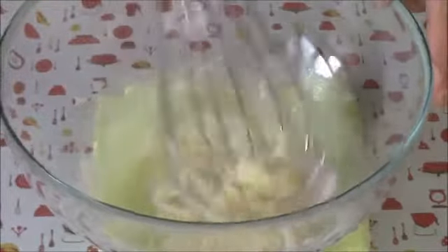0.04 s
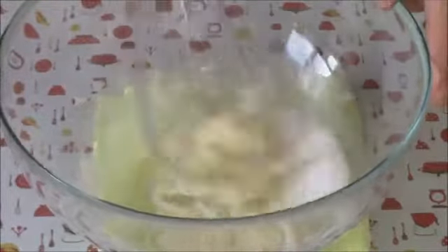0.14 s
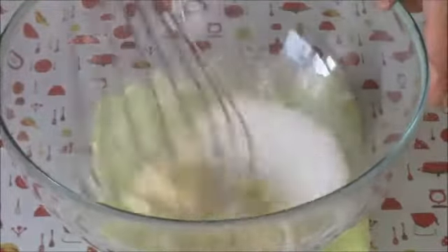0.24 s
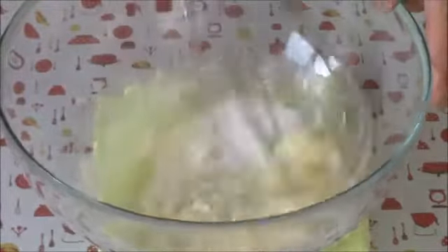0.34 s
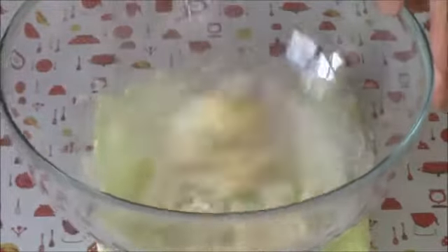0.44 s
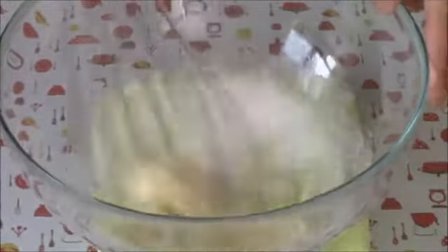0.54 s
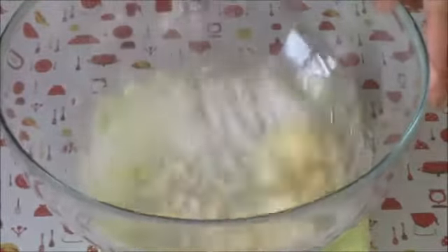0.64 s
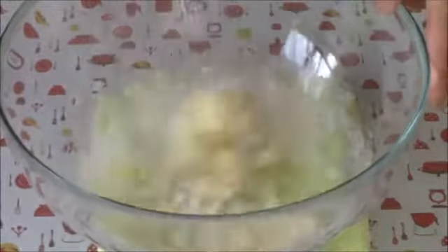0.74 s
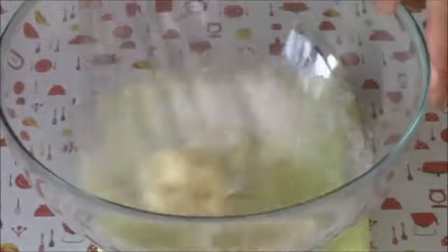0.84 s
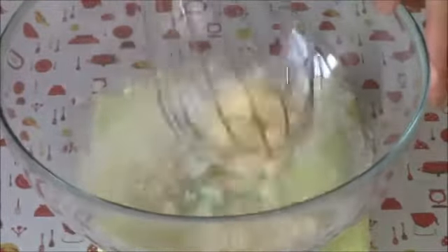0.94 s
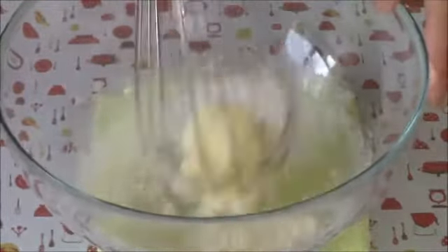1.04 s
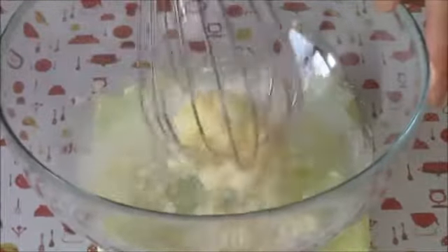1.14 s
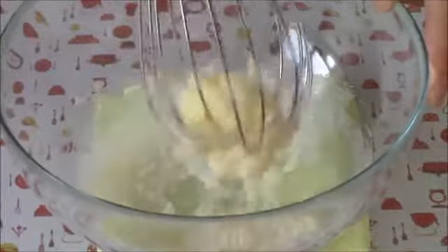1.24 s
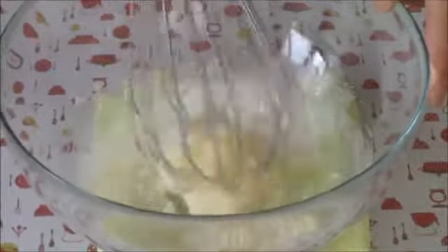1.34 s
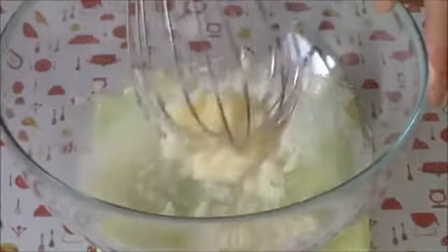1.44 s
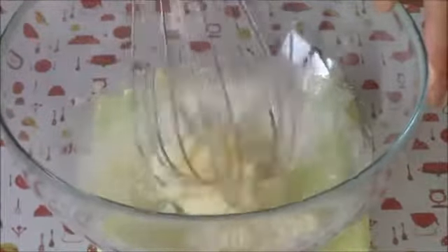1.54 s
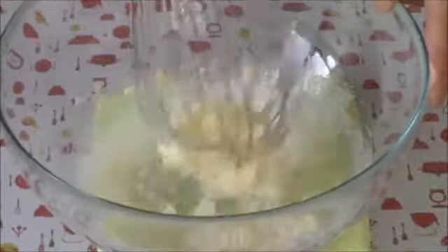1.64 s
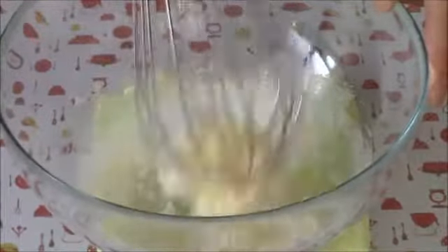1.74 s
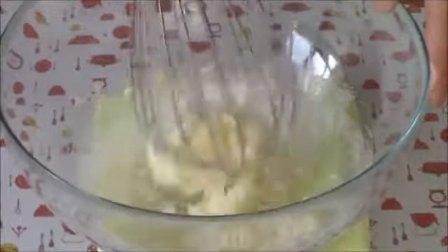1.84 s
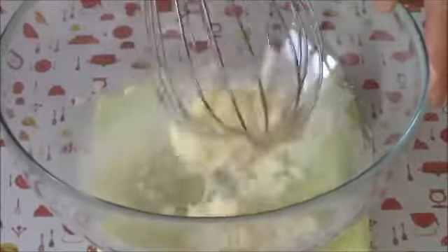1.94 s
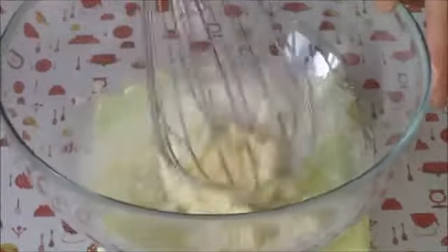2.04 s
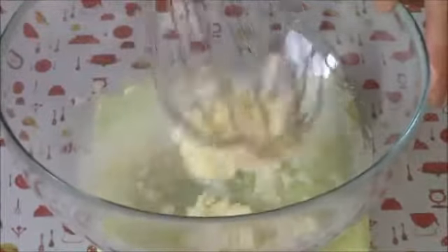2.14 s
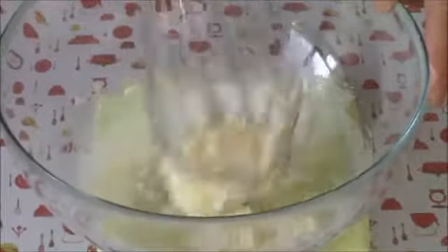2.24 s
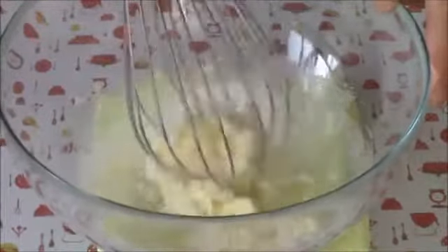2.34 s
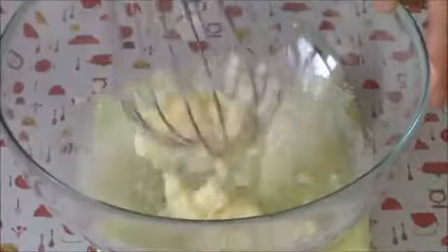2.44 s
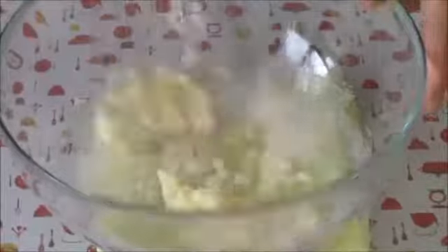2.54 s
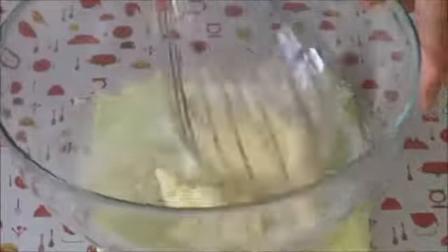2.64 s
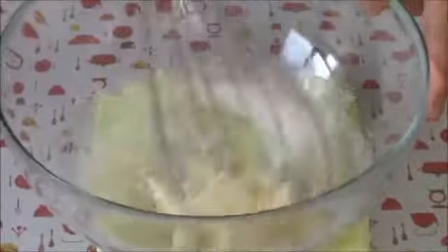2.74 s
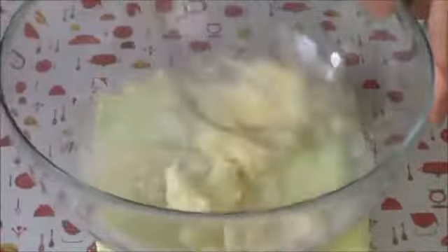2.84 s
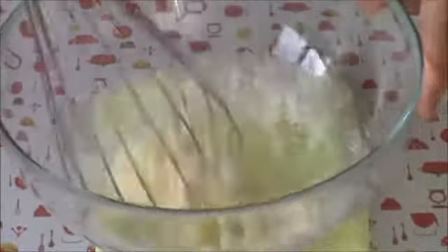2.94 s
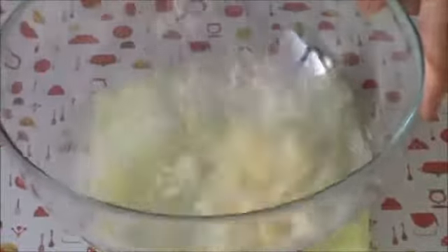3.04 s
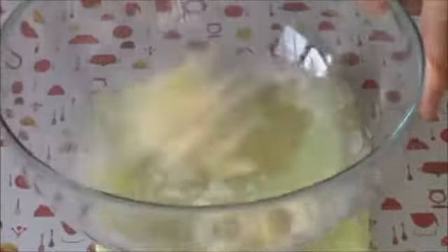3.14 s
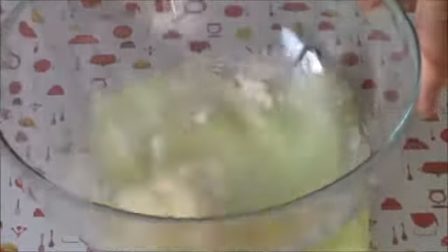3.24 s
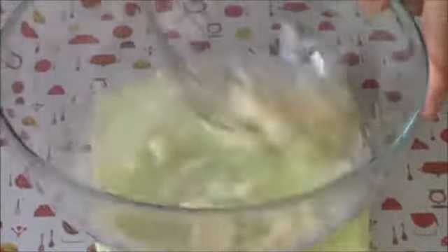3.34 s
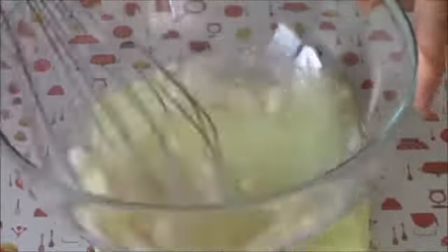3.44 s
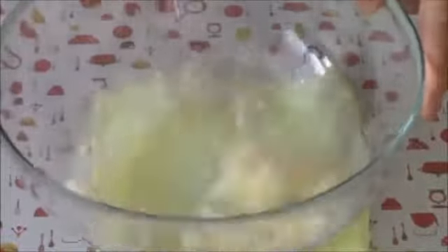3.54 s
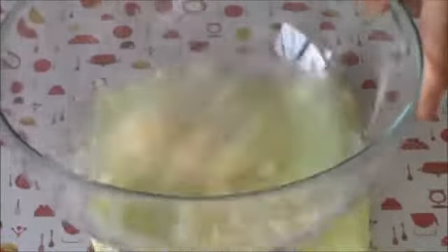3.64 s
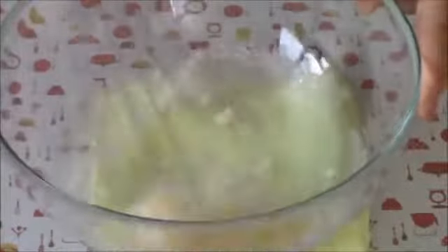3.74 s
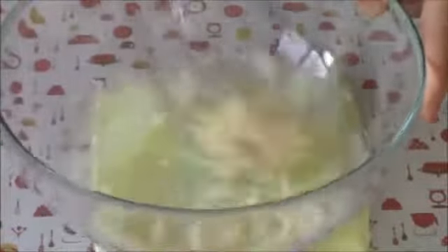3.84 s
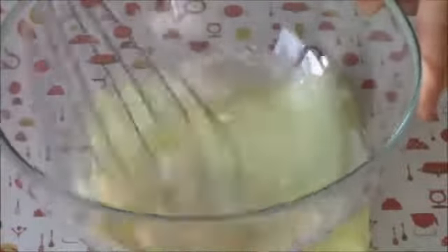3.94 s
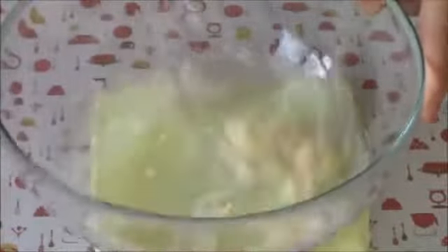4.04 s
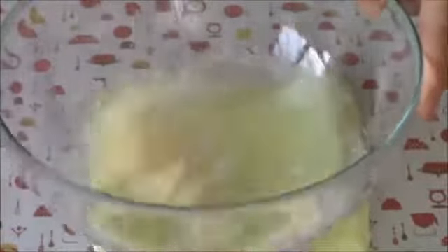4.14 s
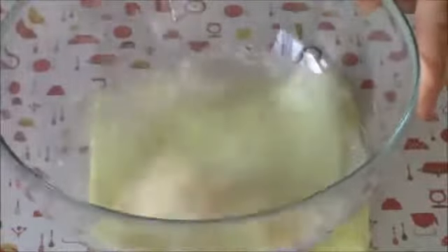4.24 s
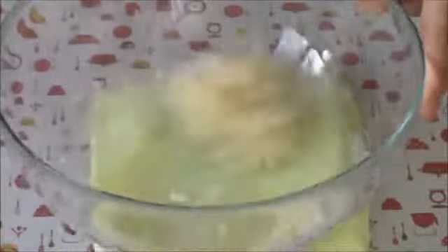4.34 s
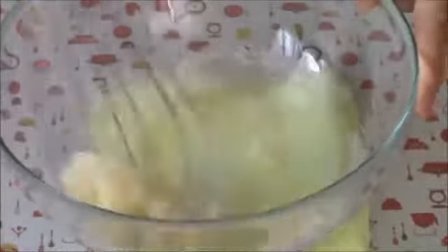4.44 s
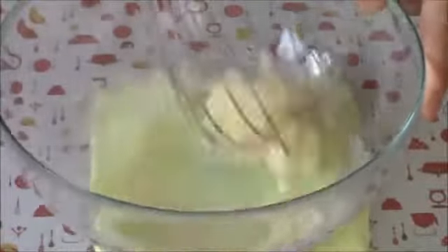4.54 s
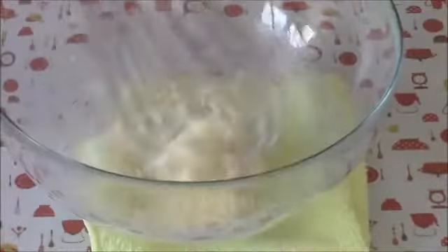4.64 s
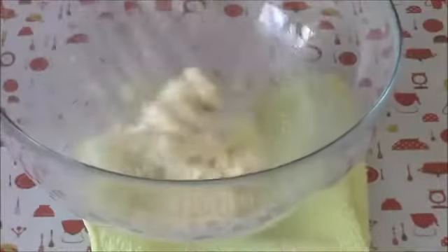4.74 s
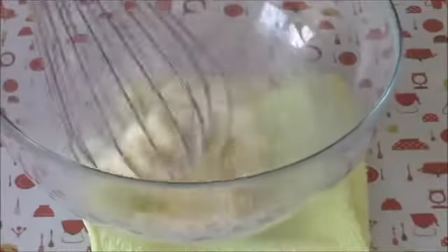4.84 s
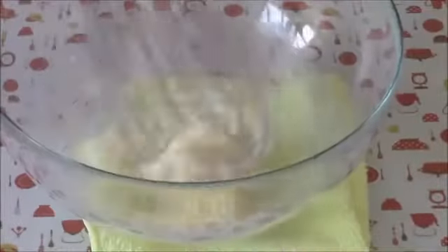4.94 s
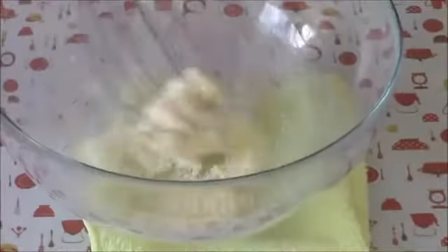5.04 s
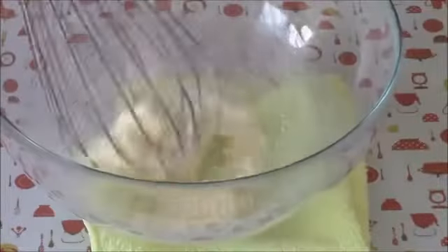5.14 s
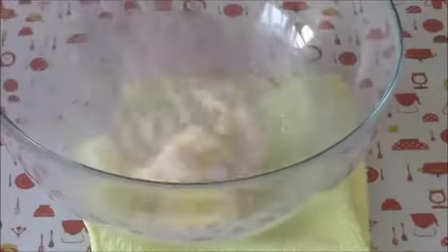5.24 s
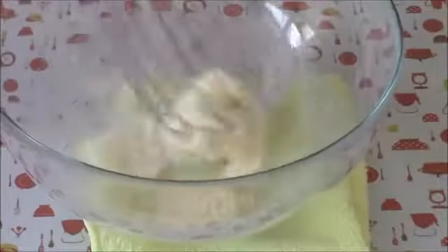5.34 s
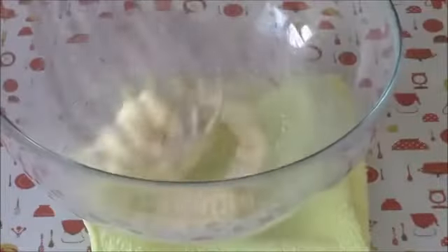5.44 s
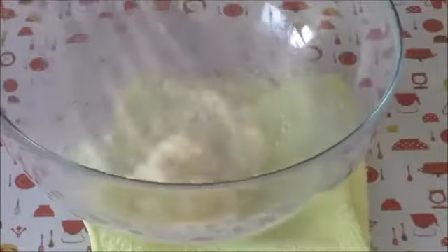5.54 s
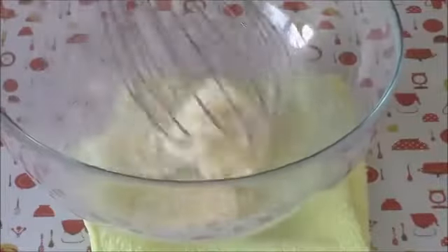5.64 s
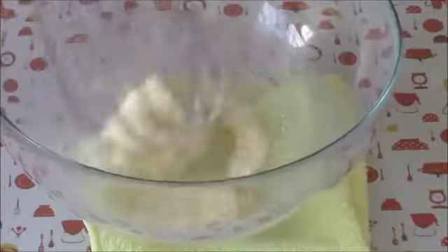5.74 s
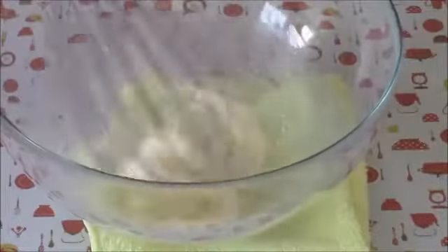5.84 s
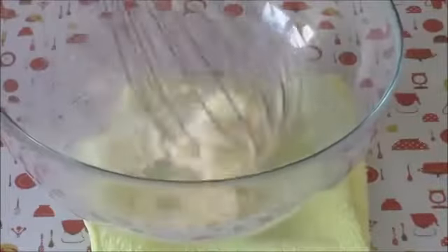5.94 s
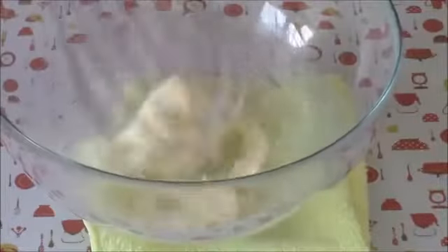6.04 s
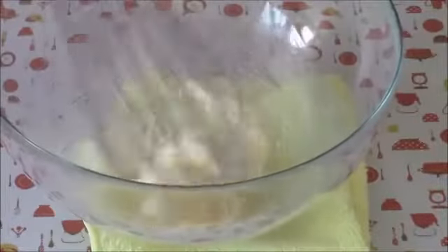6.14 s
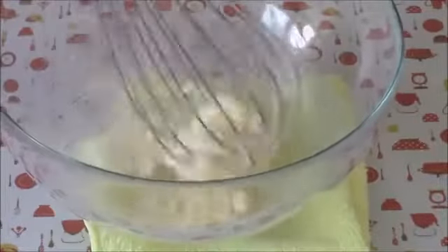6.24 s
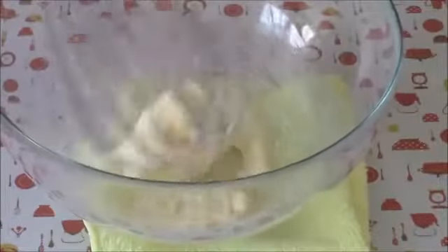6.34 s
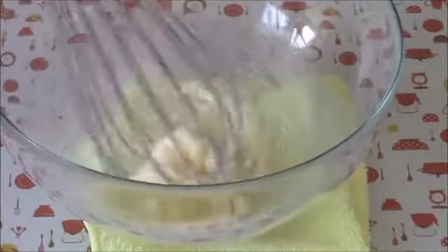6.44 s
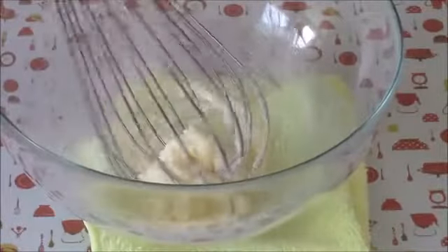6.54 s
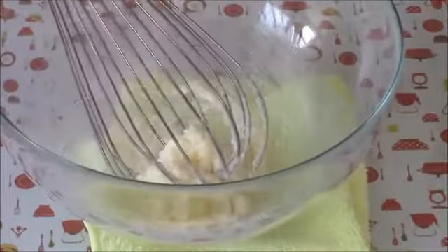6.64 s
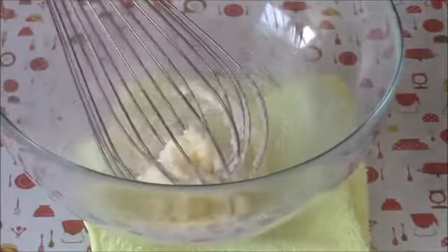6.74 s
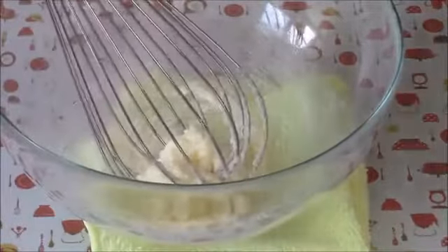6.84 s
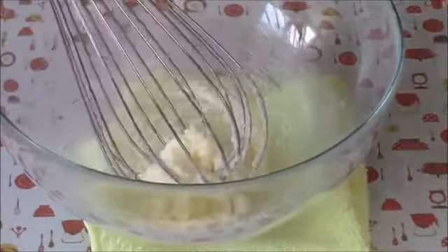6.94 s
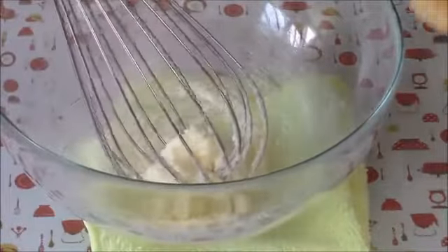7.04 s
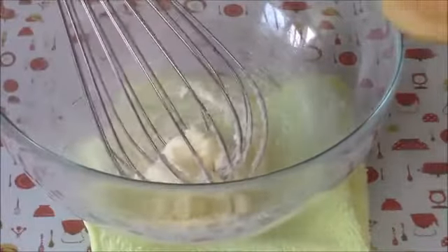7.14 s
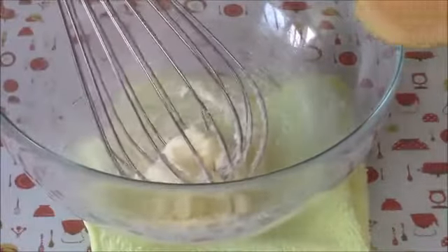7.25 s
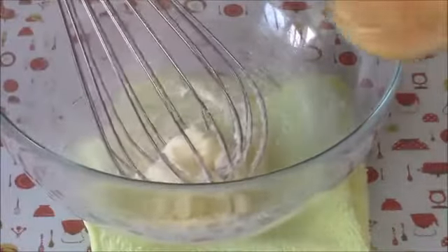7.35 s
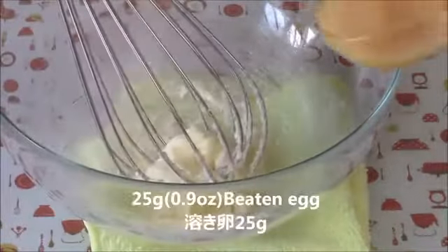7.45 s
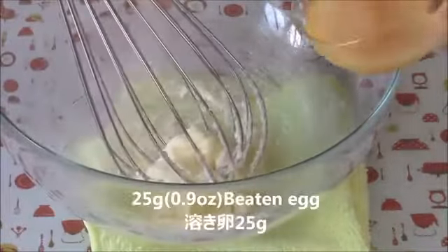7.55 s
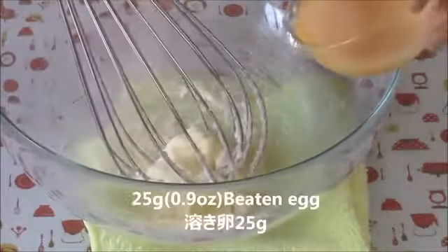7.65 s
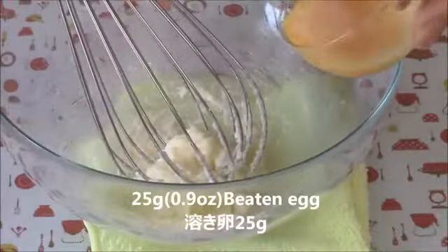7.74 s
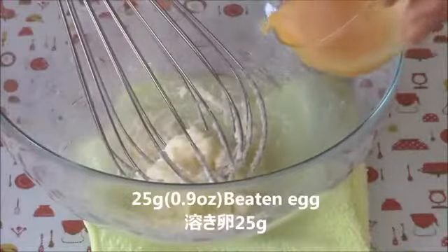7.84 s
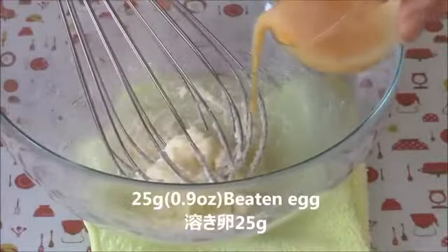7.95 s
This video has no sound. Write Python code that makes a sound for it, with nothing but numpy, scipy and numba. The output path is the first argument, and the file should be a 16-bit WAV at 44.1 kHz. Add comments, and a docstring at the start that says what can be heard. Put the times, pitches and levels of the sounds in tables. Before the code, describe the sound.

A wire whisk sweeps through grainy sugar, then stabs the glass bowl in a steady run of loud metallic clinks and dull table knocks. Busy crunchy scraping with smaller clinks comes next. Midway the background drops abruptly and the strokes become soft and muffled. They die out into faint air, tiny ticks and cricket chirps, heard close in a small room.

```python
"""A wire whisk clinks and scrapes through butter and sugar in a glass bowl, close to the ear.
Most hard stabs are followed by a knock as the bowl is driven onto the table.
Noise bursts and sliding noise shake sets of ringing modes: wires, sugar, bowl and table.
A small kitchen adds its echo, with faint air noise, even ticking and a cricket outside.
At 4.737 s the background drops, and the last strokes are quieter and duller."""
import sys
import numpy as np
from scipy import signal
from scipy.fft import rfft, irfft
from scipy.io import wavfile
from scipy.ndimage import uniform_filter1d
from numba import njit

SR = 44100
rng = np.random.default_rng(int(sys.argv[2]) if len(sys.argv) > 2 else 0)


def store_wav(level_fs):
    """Save 16-bit WAV to argv[1]."""
    pcm = np.round(np.clip(np.atleast_2d(level_fs), -1, 1) * 32767)
    wavfile.write(sys.argv[1], SR, pcm.T.astype(np.int16))


N = 352800
T = np.arange(N) / SR  # time of every sample, s

# Levels in the tables are starting levels; the functions below then balance the layers.
# Wires meeting the glass: time_s, level_db
WIRE_CLINKS = [(0.0422, -26.5), (0.185, -34), (0.343, -20.5), (0.6564, -15.5), (0.708, -23.5),
               (1.0816, -5.5), (1.3228, -6.5), (1.5584, -5.5), (1.796, -5), (2.044, -10), (2.296, -9),
               (2.5606, -8), (2.697, -21), (2.8116, -24.5), (2.981, -28.5), (3.071, -22), (3.13, -28),
               (3.207, -24), (3.218, -12), (3.2814, -22), (3.3188, -18.5), (3.37, -26), (3.397, -23.5),
               (3.4097, -22.5), (3.472, -26.5), (3.521, -27), (3.5726, -16.5), (3.6522, -23), (3.712, -23),
               (3.8158, -20.5), (3.891, -24.5), (3.939, -17.5), (4.0414, -23.5), (4.137, -22.5),
               (4.172, -24), (4.1932, -20), (4.295, -20), (4.3868, -20.5), (4.412, -26), (4.435, -25),
               (4.5109, -14.5), (4.547, -18), (4.662, -15.5), (4.716, -20.5), (4.875, -31.5), (4.888, -38),
               (4.965, -44), (5.199, -33.5), (5.605, -39), (5.8422, -29), (5.9304, -39.5), (6.125, -49),
               (6.137, -42), (6.165, -45), (6.392, -38), (6.4064, -36), (6.471, -38), (6.59, -39.5),
               (6.9677, -42.5)]
# Sweeps of the wires through the sugar: middle_s, length_s, hiss_db, crunch_db (added to the hiss level)
WHISK_STROKES = [(0.196, 0.06, -49, -8), (0.364, 0.015, -40.5, -13), (0.498, 0.1, -44, -4.5),
                 (0.617, 0.02, -45.5, -14), (0.7, 0.048, -47.5, 0), (0.773, 0.051, -46.5, -10),
                 (2.607, 0.061, -51.5, -23), (2.702, 0.016, -49, 5.5), (2.845, 0.067, -44, -6.5),
                 (2.947, 0.052, -44.5, -13), (3.076, 0.021, -45.5, -3.5), (3.164, 0.021, -41, -1),
                 (3.234, .04, -56, -1), (3.347, 0.036, -40.5, -9), (3.423, 0.061, -50, 0.5),
                 (3.554, 0.078, -41, -4.5), (3.64, 0.041, -40, -11), (3.783, 0.063, -43, -12),
                 (3.83, 0.025, -58, -2), (3.874, 0.031, -42.5, -10), (4.064, 0.016, -37.5, -6),
                 (4.163, 0.064, -49, -0.5), (4.301, 0.019, -32.5, -11.5), (4.385, 0.018, -46, -4),
                 (4.53, 0.018, -37, -7), (4.652, 0.027, -40, -9), (4.873, 0.037, -50, -13),
                 (5.05, 0.094, -60, -2), (5.222, 0.05, -54.5, -9), (5.41, 0.062, -68.5, 4),
                 (5.485, 0.063, -53.5, -13), (5.673, 0.077, -60.5, 3), (5.866, 0.06, -58, -23),
                 (5.96, 0.068, -60.5, -4), (6.112, 0.042, -59, -20), (6.244, 0.012, -55.5, 1.5),
                 (6.33, 0.18, -59, -2), (6.474, 0.037, -51.5, -3), (6.739, 0.057, -66, -3)]
# Spells of whisking, with a steady slide under the strokes: start_s, end_s, drag_db, crunch_db
WHISK_SPELLS = [(0.048, 0.803, -55, -55.5), (2.814, 4.708, -50.5, -53), (4.74, 6.157, -58.5, -60.5)]
# Dry ticks of a single wire tip that hardly ring: time_s, level_db
TIP_TICKS = [(0.378, -28), (0.761, -19), (2.789, -31), (2.853, -30), (2.933, -26), (3.503, -24),
             (3.82, -17), (4.269, -32), (4.279, -23), (4.493, -33), (4.637, -31.5), (4.787, -38.5),
             (4.858, -29), (4.906, -32), (5.07, -29), (5.414, -37), (5.445, -36), (5.471, -42),
             (5.511, -37), (5.648, -30.5), (5.708, -33), (5.845, -33), (6.053, -37.5), (6.238, -32),
             (6.455, -43), (6.59, -30)]
# Dull taps on the bowl wall: time_s, level_db, favoured_pitch_hz
BOWL_TAPS = [(0.049, -31.5, 613), (0.346, -36, 643), (0.66, -38, 774), (0.709, -40, 1470),
             (1.081, -24.5, 790), (1.324, -18, 700), (1.56, -11.5, 2750), (1.801, -17, 2460),
             (2.05, -13.5, 2700), (2.298, -17, 654), (2.559, -26, 1470), (2.697, -30, 636),
             (2.87, -29.5, 1560), (3.127, -31.5, 1470), (3.219, -24.5, 2040), (3.282, -32.5, 950),
             (3.319, -33.5, 670), (3.369, -28, 1460), (3.573, -28, 673), (3.649, -34.5, 1460),
             (3.82, -32, 673), (3.868, -43, 1460), (3.889, -31, 1550), (4.045, -30.5, 655),
             (4.288, -23.5, 1320), (4.513, -33, 840), (4.549, -27, 1560), (4.661, -32.5, 905),
             (5.07, -43, 920), (6.24, -54, 790)]
# Bowl driven onto the table: time_s, level_db
BOWL_KNOCKS = [(1.1097, -10), (1.347, -33.5), (1.5868, -17), (1.8248, -11.5), (2.0751, -8), (2.3278, -11)]
# Ringing of the steel wires: pitch_hz, width_hz, level_db
WIRE_MODES = [(6000, 480, -8.5), (7140, 63, -6), (8177, 71, 6), (8680, 63, -4.5), (9290, 210, 2),
              (10140, 76, 5.5), (10670, 47, 0.5), (11350, 250, -4), (12400, 80, -4.5), (13300, 200, -14.5),
              (14800, 120, -19)]
# Broad colours of crushed grains: pitch_hz, width_hz, level_db
SUGAR_MODES = [(2543, 1200, -31), (3670, 1330, 9.5), (6140, 560, -0.5), (9700, 970, -0.5)]
# Ringing of the glass bowl: pitch_hz, width_hz, level_db
BOWL_MODES = [(673.6, 47, -0.5), (795, 46, 2), (888, 110, 3.5), (1463, 63, 4), (2176, 110, -10)]
# Ringing of the table top: pitch_hz, width_hz, level_db
TABLE_MODES = [(236, 22, -9.5), (497, 80, -7), (750, 78, 2.5), (1170, 74, -12), (1435, 50, -6),
               (1833, 100, 6.5), (2150, 270, -10), (2380, 120, -0.5), (2700, 57, -8.5), (3620, 29, -13.5),
               (3800, 37, -15)]
# Colour of steel ticking on glass: frequency_hz, level_db
GRIT_COLOUR = [(400, -26.5), (1100, -4), (4500, -12), (6000, 1.5), (10400, -2.5), (15000, -22)]
# Colour of the broad part of the knock: frequency_hz, level_db
THUD_COLOUR = [(30, -47.5), (120, -56), (275, -33), (400, -17), (1000, -9.5), (2200, -3.5), (3800, -9),
               (4600, -25.5), (12000, -46.5)]
# How long the room echo takes to fade by 60 dB: frequency_hz, fade_s
ROOM_FADE = [(150, 0.32), (1000, 0.34), (2800, 0.18), (7000, 0.18), (14000, .1)]
# Colour of the room air: frequency_hz, level_db
AIR_COLOUR = [(25, -27), (110, -28.5), (190, -15), (260, -6.5), (900, -2.5), (1300, -6.5), (1550, -7.5),
              (1625, 0.5), (1700, -9), (2400, -12), (5000, -18), (10000, -24), (16000, -31)]
# Cricket phrases: start_s, chirp_count, level_db
CRICKET_PHRASES = [(-.03, 1, -78), (0.856, 1, -77), (1.466, 1, -67), (1.967, 1, -67), (6.604, 2, -74),
                   (6.944, 5, -72.5), (7.674, 2, -77.5)]

CUT_S = 4.737  # the quieter part starts here
EDGE_DB_PER_S = 350  # how fast a sweep swells and fades outside its length
AIR_EARLY_DB, AIR_LATE_DB = -56, -63
CRICKET_HZ, CHIRP_S, CHIRP_GAP_S = 5561, 0.07, 0.131  # the gap runs from start to start
TICKING_HZ, TICKING_FROM_S, TICKING_EVERY_S = 2122, 0.0695, 0.06672
TICKING_LATE_DB = -58.5  # average push in the quieter part
TOP_HZ = 15100


def whisk():
    """Clinks and dragged sugar shake the wires and bowl; thin bodies give out little bass."""
    time_s, level_db = np.transpose(WIRE_CLINKS)
    drag, crunch = slides()
    clink = bursts(time_s - 0.001, level_db - 6, 0.0061, 0.00031)
    # hard stabs add a sharp crack just after the clink begins
    crack = bursts(time_s - 0.0005, 1.8 * level_db + 1.5, 0.001, 0.0003)
    steel = undb(-2) * wires(drag, clink)
    steel += undb(-5) * grit(drag, clink, crack)
    steel += undb(-8.5) * sugar(crunch)
    steel += undb(-1) * wire_tips()
    # creamed butter coats the wires
    coated = signal.sosfilt(signal.butter(1, 9000, fs=SR, output="sos"), steel)
    steel = np.where(T < CUT_S, steel, undb(4) * coated)
    return highpass(highpass(steel + bowl(crunch), 500), 230)


def slides():
    """Strokes and steady spells set the strength of drag and crunch; the wires catch and let go."""
    slip = undb(1.6 * walk(70) + 2.84 * walk(250))
    drag, crunch = np.zeros(N), np.zeros(N)
    for middle, length, hiss_db, crunch_db in WHISK_STROKES:
        stroke = sweep(middle - length / 2, middle + length / 2, hiss_db)
        drag += stroke
        crunch += stroke * undb(crunch_db)
    for start, end, drag_db, crunch_db in WHISK_SPELLS:
        drag += sweep(start, end, drag_db)
        crunch += sweep(start, end, crunch_db)
    return slip * drag, slip * crunch


def wires(drag, clink):
    """Steel wires ring when they hit or slide; sliding ones sing only in patches of bare glass."""
    singing = drag * undb(3 * walk(40) - 2.5)
    return body(crackle(0.87) * (singing + clink), WIRE_MODES, 5.6, 45, drift=0.008)


def grit(drag, clink, crack):
    """Steel ticks on glass as uneven noise; flat blows reach lower than glancing ones."""
    push = undb(-2.5) * clink + crack + undb(-2.5) * drag
    tick = colour(crackle(2.1) * push, GRIT_COLOUR)
    bright = highpass(tick, 7200)
    return bright + (tick - bright) * undb(3 * walk(22) - 5.5)


def sugar(crunch):
    """Crushed grains crackle through broad modes that wander in pitch."""
    return body(crackle(2.1) * crunch, SUGAR_MODES, 7, 22, drift=0.12)


def wire_tips():
    """Single wire tips make short dry noise ticks with hardly any ring."""
    tick = rng.standard_normal(N) * bursts(*np.transpose(TIP_TICKS), 0.0012, 0.0009)
    return colour(tick, [(1200, -15), (3000, -4.5), (11000, -3.5)])


def bowl(crunch):
    """The crunching sugar and the taps ring the glass bowl."""
    return body(crackle(3.2) * undb(-10) * crunch, BOWL_MODES, 13, 25, drift=0.028) + taps()


def taps():
    """Each tap rings mostly the bowl mode nearest to its favoured pitch."""
    time_s, level_db, favoured_hz = np.transpose(BOWL_TAPS)
    noise = rng.standard_normal(N)
    out = np.zeros(N)
    for hz, width, _ in BOWL_MODES:
        loss_db = np.minimum(60 * abs(np.log(favoured_hz / hz)), 18)
        push = noise * bursts(time_s - 0.001, level_db - loss_db, 0.0065, 0.0039)
        out += ring(push, hz * (1 + 0.026 * walk(12)), float(width))
    return out


def knocks():
    """The bowl's foot touches, then lands fully; the table top rings, clacks and gives a low thump."""
    time_s, level_db = np.transpose(BOWL_KNOCKS)
    touch = bursts(time_s - 0.0055, level_db - 8.5, 0.0048, 0.0017)
    landing = bursts(time_s - 0.001, level_db - 1.5, 0.011, 0.0012)
    push = crackle(0.4) * (touch + landing)
    table = highpass(undb(-7) * body(push, TABLE_MODES, 1.2, 6, drift=0.015), 260)
    thud = undb(-2) * colour(push, THUD_COLOUR)
    clack = rng.standard_normal(N) * bursts(time_s - 0.001, level_db - 8, 0.0062, 0.0003)
    clack = signal.sosfilt(signal.butter(2, [4200, 8500], "band", fs=SR, output="sos"), clack)
    # the table gives under each knock: a 65 Hz mode
    thump = ring(bursts(time_s, level_db, 0.0055, 0.001), 65 + 0 * T, 45.)
    thump = highpass(undb(-85.5) * unit(thump), 45)
    return table + thud + clack + thump


def kitchen(x):
    """Room echo as fading noise, with its own fade time in each octave of pitch."""
    t, tail = T[:SR // 2], 0
    room_hz, fade_s = np.transpose(ROOM_FADE)
    for hz in 100 * 2 ** np.arange(8):
        t60 = np.interp(np.log(hz), np.log(room_hz), fade_s)
        edges = [hz / 2 ** 0.5, min(hz * 2 ** 0.5, 0.45 * SR)]
        sos = signal.butter(2, edges, "band", fs=SR, output="sos")
        tail = tail + signal.sosfilt(sos, rng.standard_normal(len(t))) * undb(-60 * t / t60)
    tail = tail * np.clip(t / 0.015, 0, 1)  # the echo builds up over 15 ms
    return signal.fftconvolve(x, tail / np.sqrt(np.sum(tail ** 2)))[:N]


def cricket():
    """Phrases of short even chirps: a sine on one pitch, switched on and off with a flutter in level."""
    gate = np.zeros(N)
    for phrase_s, count, level_db in CRICKET_PHRASES:
        for k in range(round(count)):
            start = phrase_s + k * CHIRP_GAP_S
            inside_s = np.minimum(T - start, start + CHIRP_S - T)
            gate += undb(level_db) * np.clip(inside_s / 0.006, 0, 1)
    # root 2 turns the listed level into the sine's peak
    return 2 ** 0.5 * gate * undb(1.6 * walk(150)) * np.sin(2 * np.pi * CRICKET_HZ * T)


def ticking():
    """A faint, even, dull tick: noise bursts through one very broad mode."""
    time_s = np.arange(TICKING_FROM_S, N / SR, TICKING_EVERY_S)
    level_db = TICKING_LATE_DB + 1.8 * rng.standard_normal(len(time_s))
    level_db += np.where(time_s < CUT_S, AIR_EARLY_DB - AIR_LATE_DB, 0)
    push = rng.standard_normal(N) * bursts(time_s, level_db, 0.0025, 0.00078)
    return ring(push, TICKING_HZ + 0 * T, 1200.)


def air():
    """Nearly steady room noise, coloured from random samples and lower after the drop."""
    level_db = np.where(T < CUT_S, AIR_EARLY_DB, AIR_LATE_DB) + 0.5 * walk(12)
    return colour(rng.standard_normal(N), AIR_COLOUR) * undb(level_db)


def undb(db):
    """Decibels to gain."""
    return 10 ** (np.asarray(db) / 20)


def unit(x):
    """Scale to an rms (average strength) of 1."""
    return x / np.sqrt(np.mean(x ** 2))


def highpass(x, hz):
    """Take away the bass below hz."""
    return signal.sosfilt(signal.butter(2, hz, "high", fs=SR, output="sos"), x)


def walk(rate):
    """Random levels, rate per second, with sloped steps; spread near 1."""
    hold = int(SR / rate)
    steps = np.repeat(rng.standard_normal(N // hold + 1), hold)
    return uniform_filter1d(steps, hold // 2)[:N]


def bursts(times, peak_db, fade_s, rise_s):
    """Strength of contacts that start fast and die away."""
    out = np.zeros(N)
    for start, db in zip(times, peak_db):
        first = int(start * SR)
        t = np.clip(T[first:first + SR // 8] - start, 0, None)
        out[first:first + len(t)] += undb(db) * (1 - np.exp(-t / rise_s)) * np.exp(-t / fade_s)
    return out


def sweep(start, end, db):
    """Gain of a contact that holds between two times and slopes away on both sides."""
    outside_s = np.clip(np.maximum(start - T, T - end), 0, None)
    return undb(db - EDGE_DB_PER_S * outside_s)


def crackle(spread_db):
    """Noise of uneven grains: a few samples jump out above the rest."""
    jump_db = spread_db * np.minimum(rng.exponential(size=N), 4)
    return unit(rng.standard_normal(N) * undb(jump_db))


def body(push, modes, scatter_db, rate, drift):
    """Modes share the push unevenly and bend a little as contact and load move; total power stays."""
    share = np.array([undb(db + scatter_db * walk(rate)) * np.sqrt(width) for _, width, db in modes])
    share /= np.sqrt(np.sum(share ** 2, axis=0))
    out = np.zeros(N)
    for gain, (hz, width, _) in zip(share, modes):
        out += ring(push * gain, hz * (1 + drift * walk(rate / 2)), float(width))
    return out


@njit
def ring(x, hz, width):
    """One mode whose pitch may move; a wider mode dies faster; white input keeps its power."""
    y, z, p = np.empty(len(x)), 0j, 0j
    r = np.exp(-np.pi * width / SR)
    g = np.sqrt(2 * (1 - r * r))
    for i in range(len(x)):
        if i % 32 == 0:  # update the pitch
            p = r * np.exp(2j * np.pi * hz[i] / SR)
        z = z * p + x[i] + 1e-18
        y[i] = g * z.imag
    return y


def colour(x, points):
    """Filter through (frequency_hz, level_db) points, never sounding early; white input keeps its power."""
    hz, db = np.transpose(points)
    grid_hz = np.arange(1, 2050) * SR / 4096
    gain = undb(np.interp(np.log(grid_hz), np.log(hz), db))
    # folding the log spectrum forward in time makes the filter react at once
    c = irfft(np.log(gain / np.sqrt(np.mean(gain ** 2))))
    c[1:2048] *= 2
    c[2049:] = 0
    return signal.fftconvolve(x, irfft(np.exp(rfft(c))))[:len(x)]


def scene():
    """Whisk and knocks with their room echo, over cricket, ticking and air."""
    strokes, blows = whisk(), knocks()
    send = undb(-10) * strokes + undb(-9) * blows
    early = T < CUT_S
    # the echo of the first part stops short where the quieter part starts
    echo = early * kitchen(early * send) + kitchen(~early * send)
    return (strokes + blows + echo + cricket() + ticking() + air())[None]


def record(dry):
    """A steep filter takes away the treble above TOP_HZ."""
    return signal.sosfilt(signal.ellip(10, 0.2, 70, TOP_HZ, fs=SR, output="sos"), dry)


dry = scene()
out = record(dry)
store_wav(out)
```